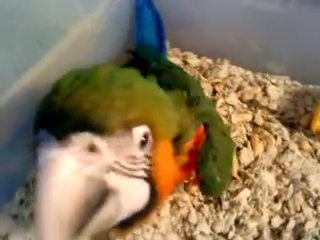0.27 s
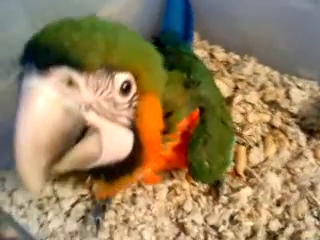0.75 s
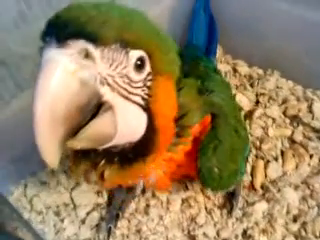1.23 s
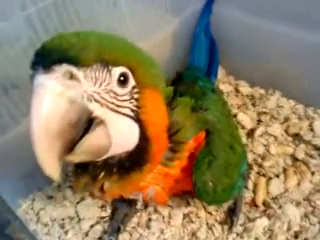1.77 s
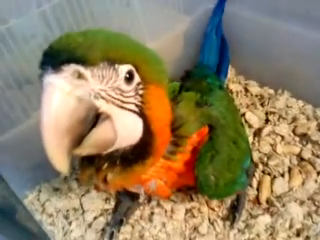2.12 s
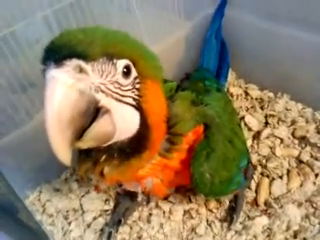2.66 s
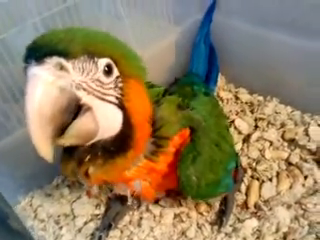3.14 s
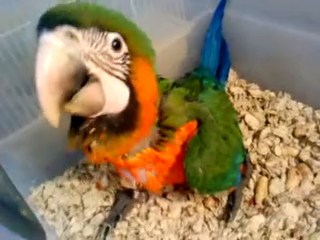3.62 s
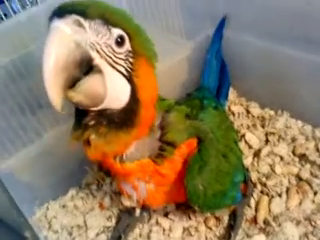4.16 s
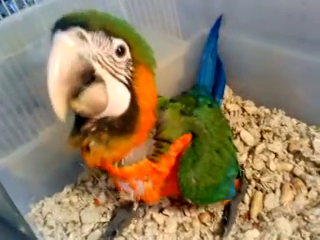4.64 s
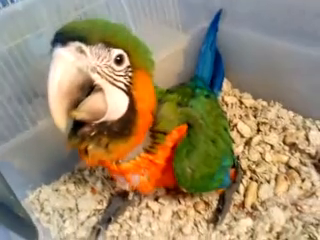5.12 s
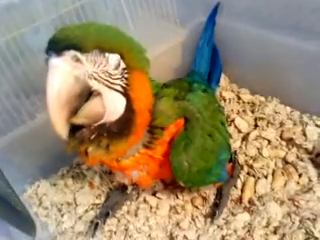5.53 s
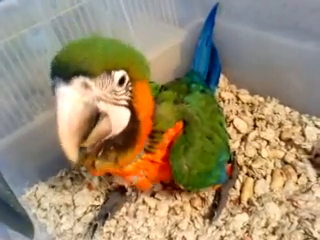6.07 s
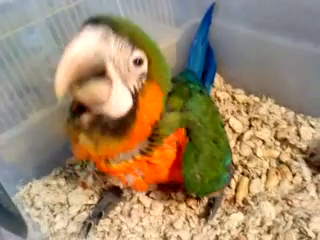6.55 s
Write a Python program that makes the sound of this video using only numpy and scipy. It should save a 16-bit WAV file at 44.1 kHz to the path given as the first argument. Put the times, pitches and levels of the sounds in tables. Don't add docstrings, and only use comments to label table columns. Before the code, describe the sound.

Close to a phone microphone, a young parrot rasps almost without pause, alternating open-beak hissy squawks with duller grumbles. Around it small birds peep, whistle and squeal. A larger parrot honks nasally within the first second, then screeches at about two and four seconds. Faint wing flutter and a low fan sit underneath, in a small hard-walled room with short echoes.

```python
import sys
import numpy as np
from scipy import signal
from scipy.io import wavfile
from scipy.ndimage import uniform_filter1d

SR = 44100
rng = np.random.default_rng(int(sys.argv[2]) if len(sys.argv) > 2 else 0)


def volts(x):
    e = np.asarray(x, float) / 20
    return 10 ** e


def log_audio(samples):
    frames = np.atleast_2d(samples).T
    limited = np.clip(frames, -1, 1)
    pcm = np.round(limited * 32767).astype(np.int16)
    wavfile.write(sys.argv[1], SR, pcm)


N = 299439


def evened(x):
    return x / np.sqrt(np.mean(x ** 2) + 1e-20)


def add(mix, start_s, sound):
    part = mix[round(start_s * SR):][:len(sound)]
    part += sound[:len(part)]


def wander(count, span_s):
    size = max(round(span_s * SR), 1)
    once = uniform_filter1d(rng.standard_normal(count), size)
    return evened(uniform_filter1d(once, size))


def resonate(x, hz, width_hz):
    turn = np.exp(2j * np.pi * np.cumsum(hz * np.ones(len(x))) / SR)
    decay = np.exp(-np.pi * width_hz / SR)
    return 2 * (turn * signal.lfilter([1 - decay], [1, -decay], x / turn)).real


def colour(x, points, patchy_db=0.):
    hz, _, z = signal.stft(x, SR, nperseg=1024, noverlap=768)
    point_hz, point_db = np.transpose(points)
    patches = uniform_filter1d(rng.standard_normal(z.shape), 7, 0)
    patches = evened(uniform_filter1d(patches, 7, 1))
    shape_db = np.interp(np.log(hz + 1), np.log(point_hz), point_db, -90, -90)[:, None]
    shape_db = shape_db + patchy_db * patches
    shaped = signal.istft(z * volts(shape_db), SR, nperseg=1024, noverlap=768)[1]
    return evened(shaped[:len(x)])


def membrane(hz, jitter, span_s, air):
    turns = np.cumsum(hz * np.exp(jitter * wander(len(hz), span_s))) / SR
    snaps = np.diff(np.floor(turns), prepend=0) * volts(1.6 * rng.standard_normal(len(hz)))
    puffs = (1.1 + np.exp(-(turns % 1) / 0.52)) * rng.standard_normal(len(hz))
    air = np.clip(air, 0, 1)
    return (1 - air) * evened(snaps) + air * evened(puffs)


RISE_DB = 20
BRISK_S = 0.057


def below(t, top_s, rise_s, hold_s, fall_db_s):
    swell_db = RISE_DB * (top_s - t) / abs(rise_s)
    fall_db_s = fall_db_s * (1 + BRISK_S / (abs(rise_s) + abs(hold_s)))
    fade_db = fall_db_s * (t - top_s - abs(hold_s))
    return np.maximum(np.maximum(swell_db, fade_db), 0)


# (time of full voice [s], rise [s], hold [s], throat level [dB], beak hiss level [dB])
OPEN_BEAK_SQUAWKS = [(.09, 0.27, 0.088, -27, -27.5), (.385, 0.084, 0.047, -28, -20.5),
                     (.905, 0.25, 0.085, -25, -28), (1.372, 0.14, 0.037, -26.5, -25.5),
                     (1.652, 0.09, 0.0067, -24, -26), (1.976, 0.13, 0.17, -26, -26),
                     (2.279, 0.083, 0.097, -24, -19.5), (2.583, 0.3, 0.016, -24, -22.5),
                     (2.69, 0.11, .02, -30, -31.5), (2.846, 0.0082, 0.13, -30.5, -33.5),
                     (3.5, 0.056, 0.036, -30.5, -34.5), (3.565, 0.045, 0.037, -28.5, -20.5),
                     (3.705, 0.03, 0.024, -23.5, -21), (3.84, 0.11, 0.02, -26, -17.5),
                     (3.91, 0.077, 0.0082, -32, -18.5), (4.664, 0.2, 0.029, -29, -33.5),
                     (4.788, 0.041, 0.063, -28.5, -21.5), (5.459, 0.13, 0.02, -22.5, -22),
                     (5.572, 0.12, 0.016, -34.5, -19.5), (5.862, 0.37, 0.025, -23.5, -31),
                     (6.345, 0.055, 0.027, -31, -35), (6.405, 0.018, 0.048, -32.5, -28.5),
                     (6.64, 0.21, .14, -32.5, -29.5)]
# (time of full voice [s], rise [s], hold [s], throat level [dB], beak hiss level [dB])
SHUT_BEAK_GRUMBLES = [(0, .1, 0.012, -27, -35), (.568, 0.082, 0.12, -20.5, -33.5),
                      (1.235, 0.081, .03, -26.5, -36), (1.57, 0.13, 0.027, -30.5, -40.5),
                      (1.896, 0.077, .01, -28.5, -35.5), (3.292, 0.21, 0.015, -26.5, -46),
                      (4.05, 0.16, 0.083, -23, -34), (4.25, 0.3, 0.027, -19.5, -34.5),
                      (4.42, 0.22, 0.0049, -33.5, -42), (4.575, 0.075, 0.025, -32, -38.5),
                      (4.979, 0.098, .085, -27.5, -41.5), (5.148, 0.065, 0.0032, -33, -34),
                      (5.252, 0.3, 0.083, -25, -36.5), (5.717, 0.72, .005, -28, -38),
                      (6.126, 0.089, 0.11, -29, -42.5), (6.55, 0.35, 0.0078, -28, -41)]
# (frequency [Hz], level [dB per Hz])
THROAT_SPECTRUM = [(530, -47.5), (900, -24), (1310, -5.5), (1620, -2.5), (2010, 1.5), (2390, 5), (2980, 1),
                   (4300, -4), (6000, -23.5), (7800, -27.5), (13200, -120)]
# (frequency [Hz], level [dB per Hz])
BEAK_SPECTRUM = [(2060, -14.5), (3500, -3), (4680, -3), (5090, -2.5), (5250, -1), (6800, -4.5), (8000, -17),
                 (9050, -41.5), (11800, -70.5), (19900, -120)]
SQUAWK_FALL_DB_S, GRUMBLE_FALL_DB_S = 108.5, 88
BEAK_STEEPER = 1.12
REST_THROAT_DB, REST_BEAK_DB = -45, -60
THROAT_HZ, THROAT_HZ_PER_DB = 3120, 16


def chick():
    t = np.arange(0, N / SR + .02, .001)
    throat_power, beak_power = volts(2 * REST_THROAT_DB), volts(2 * REST_BEAK_DB)
    voices = (OPEN_BEAK_SQUAWKS, SQUAWK_FALL_DB_S), (SHUT_BEAK_GRUMBLES, GRUMBLE_FALL_DB_S)
    for calls, fall_db_s in voices:
        for top_s, rise_s, hold_s, throat_db, beak_db in calls:
            under_db = below(t, top_s, rise_s, hold_s, fall_db_s)
            throat_power = throat_power + volts(2 * (throat_db - under_db))
            beak_power = beak_power + volts(2 * (beak_db - BEAK_STEEPER * under_db))
    sample_s = np.arange(N) / SR
    throat_db = np.interp(sample_s, t, 10 * np.log10(throat_power))
    beak_db = np.interp(sample_s, t, 10 * np.log10(beak_power))
    drive = membrane(np.full(N, 340.), jitter=.3, span_s=.004, air=.82)
    drive *= volts(.8 * wander(N, .012))
    throat = colour(drive, THROAT_SPECTRUM, patchy_db=3.3)
    throat_hz = THROAT_HZ + THROAT_HZ_PER_DB * (throat_db + 28)
    throat = evened(throat + .8 * resonate(throat, throat_hz, width_hz=900))
    beak = colour(drive, BEAK_SPECTRUM, patchy_db=4.0)
    return volts(throat_db - 4.0) * throat + volts(beak_db - 1.5) * beak


# (frequency [Hz], level [dB per Hz])
FAN_SPECTRUM = [(12, -45), (20, 3.5), (54, -9), (190, -15.5), (341, -12.5), (555, -16), (949, -14.5),
                (2210, -7.5), (3000, -19.5), (3590, -18.5), (6790, -41.5), (7920, -36), (9000, -56),
                (11700, -86), (19800, -120)]
# (frequency [Hz], level [dB])
MOTOR_TONES = [(53.8, -62), (140.0, -62.5), (231.5, -64), (344.5, -61.5)]
FAN_DB = -43.5


def fan():
    sound = volts(FAN_DB) * colour(rng.standard_normal(N), FAN_SPECTRUM)
    hiss = rng.standard_normal(N)
    for hz, db in MOTOR_TONES:
        tone = resonate(resonate(hiss, hz, width_hz=12), hz, width_hz=12)
        sound = sound + volts(db) * evened(tone)
    return sound


TRILL_HZ, TRILL_DEPTH = 85, .35


def chirp(length_s, start_hz, middle_hz, end_hz, db, waver_hz):
    u = np.linspace(-1, 1, round(1.15 * length_s * SR))
    arch_hz = (end_hz + start_hz) / 2 - middle_hz
    hz = middle_hz + (end_hz - start_hz) / 2 * u + arch_hz * u ** 2
    hz = hz + waver_hz * wander(len(u), .0025)
    beat = np.cumsum(TRILL_HZ * np.exp(.4 * wander(len(u), .008))) / SR + rng.random()
    burr = volts(2.4 * wander(len(u), .0018)) * (1 + TRILL_DEPTH * np.sin(2 * np.pi * beat))
    tone = np.sin(2 * np.pi * np.cumsum(hz) / SR)
    envelope = np.clip(np.minimum(.7 * (1 + u), .4 * (1 - u)) * length_s / .015, 0, 1)
    return volts(db + 2.5) * burr * tone * envelope


def glide(rows, overtones_db, waver, burr_db):
    s, pitch_hz, level_db = np.transpose(rows)
    t = np.arange(s[0], s[-1], 1 / SR)
    hz = np.interp(t, s, pitch_hz) * (1 + waver * wander(len(t), .003))
    turns = np.cumsum(hz) / SR
    tone = np.zeros(len(t))
    for k, db in enumerate((0, *overtones_db), 1):
        tone += volts(db + burr_db * wander(len(t), .003)) * np.sin(2 * np.pi * k * turns)
    level = np.sqrt(2) * volts(np.interp(t, s, level_db))
    return s[0], level * tone * signal.windows.tukey(len(t), .025)


# (time [s], length [s], pitch [Hz], level [dB])
HELD_NOTES = [(1.679, 0.049, 1586, -39.5), (3.297, 0.036, 1147, -43), (4.03, 0.022, 2230, -25.5),
              (4.22, .06, 1873, -25.5), (4.56, 0.022, 1916, -31.5), (4.579, 0.046, 2750, -32),
              (5.03, 0.029, 2147, -26), (5.031, .04, 2720, -28), (5.22, 0.036, 1276, -43),
              (6.071, .025, 1800, -33.5), (1.57, .039, 2250, -33.5), (2.041, 0.051, 2298, -28.5),
              (2.303, 0.079, 2652, -26.5), (2.482, 0.036, 2580, -33), (2.577, 0.058, 2670, -26),
              (2.696, 0.074, 2630, -38.5), (3.93, 0.035, 2310, -28.5), (4.249, .05, 2800, -25.5),
              (4.226, .03, 3090, -25), (4.184, .03, 2860, -27.5), (4.291, 0.055, 1854, -27.5),
              (5.153, 0.049, 2260, -32.5), (5.27, 0.034, 2390, -30), (6.186, 0.031, 2150, -28),
              (5.667, 0.046, 2050, -37.5), (6.72, 0.048, 2265, -31.5), (4.02, .06, 1330, -29),
              (4.963, 0.077, 1330, -50), (5, .04, 1620, -38.5), (6.55, 0.063, 2250, -35.5),
              (1.33, .08, 1020, -47), (1.49, .07, 1000, -46.5), (2.05, .1, 1200, -30.5),
              (1.955, .04, 4080, -30), (1.99, .04, 3620, -28),
              (0.585, 0.027, 3640, -29.5), (0.874, 0.034, 3070, -29), (1.879, 0.04, 2900, -33),
             (2.077, 0.027, 4020, -22.5), (3.352, 0.046, 3890, -39), (3.466, 0.026, 3014, -30.5),
             (4.12, 0.056, 3900, -25.5), (4.957, 0.055, 2880, -30), (5.654, 0.044, 3970, -29),
             (6.119, 0.037, 3780, -32.5), (6.166, .035, 3980, -34.5), (6.245, 0.021, 4340, -31),
             (3.867, 0.034, 3500, -25), (6.18, 0.028, 3070, -28), (6.311, 0.027, 3360, -32),
             (6.694, 0.068, 3290, -26), (1.14, 0.022, 3030, -23), (1.221, 0.029, 3450, -19.5),
             (5.8, 0.056, 3360, -25.5), (5.41, 0.03, 4210, -30), (5.457, .05, 4600, -31),
             (1.291, 0.17, 4170, -34.5), (1.332, 0.032, 3305, -19.5), (1.366, 0.075, 3964, -23),
             (1.742, 0.046, 3716, -30), (1.851, 0.06, 3396, -30), (2.036, 0.036, 3625, -24),
             (2.059, 0.071, 2877, -25.5), (2.492, 0.096, 3044, -30.5), (3.172, 0.052, 3140, -40.5),
             (3.789, 0.057, 3344, -25), (4.276, 0.085, 3770, -37.5), (4.484, 0.025, 3524, -27),
             (4.526, .035, 3585, -33), (4.847, 0.09, 2972, -24), (5.223, 0.061, 3825, -25),
             (5.511, 0.011, 3120, -7.5), (5.567, 0.07, 2965, -23), (5.794, 0.078, 3585, -23),
             (5.863, 0.053, 2930, -21), (5.904, 0.043, 3480, -25), (6.018, 0.023, 3720, -27),
             (6.133, 0.027, 3120, -30.5), (6.567, 0.054, 3170, -26), (6.59, 0.059, 3894, -21),
             (6.627, 0.052, 3060, -20.5), (6.679, .06, 3000, -27), (.882, .02, 3820, -29.5),
             (4.025, .04, 3050, -23), (4.043, .05, 3896, -26),
              (0.792, 0.037, 4490, -40), (0.031, 0.053, 4580, -33), (0.668, 0.047, 6020, -29.5),
              (5.393, 0.045, 5170, -32), (5.551, 0.026, 5010, -22.5), (2.861, 0.087, 6700, -41),
              (6.375, 0.027, 4770, -41), (6.4, 0.024, 4300, -43), (1.291, 0.017, 5420, -26),
              (1.553, 0.051, 4690, -35), (1.554, 0.045, 6640, -33), (1.74, 0.022, 4510, -29.5),
              (1.898, 0.04, 4550, -43), (2.019, 0.018, 5805, -18), (1.96, .03, 5230, -30),
              (2.052, .03, 4680, -30), (2.124, 0.051, 4850, -27), (2.322, 0.042, 4880, -24),
              (2.484, 0.027, 4730, -24.5), (2.534, 0.042, 4800, -27.5), (2.587, 0.033, 5310, -19),
              (3.432, 0.018, 5080, -32.5), (3.981, 0.046, 4556, -23), (4.788, 0.086, 4554, -24.5),
              (6.752, 0.033, 4450, -28.5)]
# (time [s], length [s], start pitch [Hz], end pitch [Hz], level [dB])
FALLING_NOTES = [(2.926, 0.041, 3300, 2595, -38), (1.802, .035, 3620, 3440, -36.5),
                 (0.538, 0.048, 3757, 3390, -22.5), (1.884, 0.07, 3390, 2600, -30.5),
                 (1.932, .04, 2500, 2250, -31), (4.471, 0.03, 4390, 3960, -33.5),
                 (1.126, .042, 4800, 2950, -32.5), (1.308, 0.063, 4100, 3230, -24.5),
                 (1.366, 0.048, 4160, 3880, -21.5), (2.922, 0.028, 4130, 3120, -34),
                 (2.949, 0.096, 1496, 1062, -47.5), (3.039, 0.12, 1070, 916, -48),
                 (3.258, 0.035, 4210, 3730, -33), (5.058, 0.06, 5290, 4800, -27),
                 (5.094, .06, 4730, 4340, -27), (5.769, 0.036, 3910, 3645, -21.5),
                 (5.816, 0.055, 3695, 3400, -22), (6.557, 0.03, 4650, 4520, -25.5),
                 (6.561, .03, 4250, 4100, -26.5), (6.72, .04, 4720, 4370, -24.5),
                 (1.005, .025, 3400, 2300, -22.5)]
# (time [s], length [s], start pitch [Hz], end pitch [Hz], level [dB])
RISING_NOTES = [(6.343, .09, 2193, 2554, -41.5), (6.575, 0.062, 3155, 3897, -19.5),
                (0.468, 0.14, 1043, 1128, -49), (1.955, 0.05, 5090, 5700, -37),
                (4.809, 0.071, 3610, 3860, -24.5), (5.192, 0.036, 3120, 3370, -24),
                (5.294, 0.11, 2820, 3195, -28.5)]
# (time [s], pitch [Hz], level [dB])
LONG_WHISTLE = [(0.0, 5410, -17), (.035, 5286, -21.5), (0.064, 5198, -21.5), (0.132, 5270, -31),
                (0.138, 5260, -20), (0.236, 5200, -44), (0.34, 5234, -48), (0.36, 5379, -48)]
# (time [s], pitch [Hz], level [dB])
SQUEAL_CURVES = [
    [(.278, 1545, -44), (.31, 1700, -36), (.345, 1950, -31), (.378, 2110, -25), (.42, 2060, -28),
     (.48, 2010, -26), (.54, 2050, -25.5), (.6, 2070, -33), (.72, 2110, -40)],
    [(5.36, 1640, -39), (5.402, 1854, -40.5), (5.436, 1930, -29), (5.47, 2290, -29.5), (5.51, 2380, -41)],
    [(6.395, 1400, -42), (6.45, 1560, -34), (6.483, 1780, -32), (6.508, 1900, -28), (6.55, 1910, -32),
     (6.585, 1930, -37), (6.62, 1975, -31), (6.69, 1940, -41)],
]
# (second partial level [dB], third partial level [dB])
SQUEAL_PARTIALS = [
    (-10, -12),
    (3, -21.5),
    (2.5, -13),
]
# (time [s], pitch [Hz], level [dB])
HIGH_PIPE = [(2.055, 5760, -38), (2.085, 5880, -21), (2.11, 5870, -22), (2.13, 5810, -22.5),
             (2.165, 5790, -27), (2.185, 5780, -23), (2.21, 5800, -34), (2.232, 5800, -26),
             (2.25, 5780, -38)]
PEEP_DROOP = 0.0078
STEADY_S = .06
SLIDE_WAVER_HZ, PEEP_WAVER_HZ = 115, 70
CHATTER_PER_S, CHATTER_HZ, CHATTER_DB, CHATTER_SPREAD_DB = 26, (1400, 4000), -49, 2.2


def flock():
    small = np.zeros(N)
    for s, length_s, hz, db in HELD_NOTES:
        waver_hz = PEEP_WAVER_HZ * min(STEADY_S / length_s, 1)
        add(small, s, chirp(length_s, hz, hz, hz * (1 - PEEP_DROOP), db, waver_hz))
    for s, length_s, start_hz, end_hz, db in FALLING_NOTES + RISING_NOTES:
        middle_hz = (start_hz + end_hz) / 2
        waver_hz = SLIDE_WAVER_HZ * start_hz / 3500
        add(small, s, chirp(length_s, start_hz, middle_hz, end_hz, db, waver_hz))
    add(small, *glide(LONG_WHISTLE, (), waver=.004, burr_db=2))
    for rows, overtones_db in zip(SQUEAL_CURVES, SQUEAL_PARTIALS):
        add(small, *glide(rows, overtones_db, waver=.03, burr_db=3))
    add(small, *glide(HIGH_PIPE, (), waver=.014, burr_db=2.2))
    low_hz, high_hz = CHATTER_HZ
    for when, long, pitch, slide, size in rng.random((round(CHATTER_PER_S * N / SR), 5)):
        hz = low_hz * (high_hz / low_hz) ** pitch
        db = CHATTER_DB - CHATTER_SPREAD_DB * np.log(size + .05)
        db = db + 9 * (pitch - 1)
        note = chirp(.025 + .06 * long, hz, hz, hz * (.93 + .12 * slide), db, hz / 50)
        add(small, when * N / SR, note)
    return small


# (time [s], length [s], effort [dB])
HONK_EVENTS = [
    (.535, .14, -37),
    (.668, .087, -36),
    (.9, .128, -19.5),
]
# (time [s], pitch [Hz])
HONK_PITCH_CURVES = [
    [(.545, 376), (.59, 385), (.62, 402), (.665, 384)],
    [(.678, 410), (.708, 417), (.725, 434), (.745, 420)],
    [(.912, 500), (.928, 517), (.948, 503), (1.0, 527), (1.016, 515)],
]
# (frequency [Hz], level [dB])
HONK_SPECTRUM = [(690, 1), (860, 1), (1020, -21), (1550, -11), (2050, -1), (2600, 0), (3100, 0), (4800, 0),
                 (5800, -8), (8200, -30)]
SCOOP_S, SCOOP = .014, .28
LOW_DB, LOW_PER_EFFORT = -34.5, .44
HONK_AIR = .12


def honk(s, length_s, effort_db, pitch):
    t = np.arange(0, length_s, 1 / SR)
    edge = np.clip(1 - np.minimum(t, length_s - t) / SCOOP_S, 0, 1)
    hz = np.interp(s + t, *np.transpose(pitch)) * (1 - SCOOP * edge)
    turns = np.cumsum(hz * (1 + .004 * wander(len(t), 0.0066))) / SR
    partials = np.zeros(len(t))
    for k in range(2, 16):
        partial = np.cos(2 * np.pi * (k * turns + rng.random()))
        partials += partial * volts(3 * wander(len(t), .012))
    high_pass = signal.butter(4, 1500, "high", fs=SR, output="sos")
    breath = signal.sosfilt(high_pass, membrane(hz, jitter=.02, span_s=.004, air=1))
    stack = (1 - HONK_AIR) * evened(partials) + HONK_AIR * breath
    low_db = LOW_DB - 6.2 * edge + LOW_PER_EFFORT * (effort_db + 22.5)
    low = volts(low_db) * np.sqrt(2) * np.sin(2 * np.pi * turns)
    stack_db = effort_db - 25 * edge - 5 * (2 * t / length_s - 1) ** 2
    note = low + volts(stack_db) * colour(stack, HONK_SPECTRUM)
    return s, note * volts(2 * wander(len(t), .012)) * signal.windows.tukey(len(t), .12)


# (time of full voice [s], rise [s], hold [s], effort [dB], pitch [Hz])
SCREECH_EVENTS = [
    (2.049, .05, 0.16, -24.5, 1195),
    (4.029, 0.1, 0.073, -19.5, 1098),
    (4.201, 0.28, 0.086, -22, 973),
]
# (frequency [Hz], level [dB per Hz])
SCREECH_SPECTRUM = [(210, -81.5), (350, -13.5), (700, -4), (910, 2), (1370, 3), (1480, -2), (1920, 3.5),
                    (2430, -7), (2950, 0), (3890, -0.5), (6840, -17), (8000, -36), (10400, -69.5),
                    (17600, -120)]
SCREECH_FALL_DB_S, SCREECH_SAG_HZ_S = 118.5, 217
SCREECH_FLOOR_HZ, FLOOR_DB_PER_OCTAVE = 480, 6


def screech(top_s, rise_s, hold_s, effort_db, start_hz):
    t = np.arange(top_s - .15, top_s + .55, 1 / SR)
    hz = start_hz - SCREECH_SAG_HZ_S * (t - top_s)
    cry = membrane(hz, jitter=.16, span_s=.003, air=.65)
    cry = colour(cry, SCREECH_SPECTRUM, patchy_db=1.3)
    cry = cry * volts(1.2 * wander(len(t), .003))
    octaves = np.clip((-20 - effort_db) / FLOOR_DB_PER_OCTAVE, -1, 1.2)
    floor_hz = SCREECH_FLOOR_HZ * 2 ** octaves
    cry = signal.sosfilt(signal.butter(4, floor_hz, "high", fs=SR, output="sos"), cry)
    level_db = effort_db + 1.0 - below(t, top_s, rise_s, hold_s, SCREECH_FALL_DB_S)
    return t[0], volts(level_db) * cry * signal.windows.tukey(len(t), .1)


# (time of full strength [s], rise [s], hold [s], level [dB])
WING_FLAPS = [
    (2.012, .1, 0.3, -50.5),
    (6.46, .05, 0.074, -54),
]
FLAP_HZ, FLAP_WIDTH_HZ, FLAP_FALL_DB_S = 377, 300, 153.5


def wings():
    air = resonate(rng.standard_normal(N), FLAP_HZ, FLAP_WIDTH_HZ)
    air = resonate(air, FLAP_HZ, FLAP_WIDTH_HZ)
    t = np.arange(N) / SR
    strength = np.zeros(N)
    for top_s, rise_s, hold_s, db in WING_FLAPS:
        strength += volts(db - below(t, top_s, rise_s, hold_s, FLAP_FALL_DB_S))
    return strength * volts(2.8 * wander(N, .008)) * evened(air)


def room(x, t60_s=.23):
    taps = np.zeros(SR // 2)
    at = np.arange(200, len(taps) - 20, 20)
    taps[at + rng.integers(0, 20, len(at))] = rng.choice([-1., 1.], len(at))
    taps *= volts(-60 * np.arange(len(taps)) / SR / t60_s)
    return signal.fftconvolve(x, taps / np.linalg.norm(taps))[:N]


def scene():
    near, steady_fan, small, large = chick(), fan(), flock(), np.zeros(N)
    for row, pitch in zip(HONK_EVENTS, HONK_PITCH_CURVES):
        add(large, *honk(*row, pitch))
    for row in SCREECH_EVENTS:
        add(large, *screech(*row))
    birds = near + small + large + room(volts(-5) * small + volts(-14) * (large + near))
    power = uniform_filter1d((birds + 0.45 * large) ** 2, round(.2 * SR))
    loud_db = 10 * np.log10(abs(power) + 1e-9)
    recovery_db = 5.5 * np.arange(N) / SR
    held_db = np.maximum.accumulate(loud_db + recovery_db) - recovery_db
    fan_gain = volts(-.55 * np.maximum(held_db + 28.5, 0) + 3.0)
    return (birds + wings() + steady_fan * fan_gain)[None]


# (frequency [Hz], rarity of a lost band [standard deviations])
DROPOUT_RARITY = [(1500, 2.8), (5500, 2.2), (6000, 1.4), (7350, .5), (7700, 1.5), (8050, .3), (9000, .7)]
# (time [s], length [s], lowest frequency [Hz])
TOP_BAND_LOSSES = [
    (.79, .07, 7400),
    (1.56, .04, 7600),
    (1.885, .085, 7500),
]


def lose_bands(x):
    hz, t, z = signal.stft(x, SR, nperseg=2048, noverlap=1536)
    chance = rng.standard_normal((len(hz), len(t)))
    chance = chance[np.arange(len(hz)) // 8]
    chance = evened(uniform_filter1d(chance, 12, 1))
    rarity_hz, rarity = np.transpose(DROPOUT_RARITY)
    kept = np.where(chance > np.interp(hz, rarity_hz, rarity, 9)[:, None], .01, 1)
    for s, length_s, low_hz in TOP_BAND_LOSSES:
        during = abs(t - s - length_s / 2) < length_s / 2 + .015
        kept[np.ix_(hz > low_hz, during)] = .003
    return signal.istft(z * kept, SR, nperseg=2048, noverlap=1536)[1][:, :N]


def top_cut(x):
    return signal.sosfilt(signal.butter(12, 9200, fs=SR, output="sos"), x)


EDGE_HZ = 9120


def record(dry):
    rounded = 0.88 * np.tanh(dry / 0.8)
    low_pass = signal.firwin(301, EDGE_HZ, window=("kaiser", 9), fs=SR)
    mix = signal.oaconvolve(lose_bands(rounded), low_pass[None], "same")
    return top_cut(mix)


dry = scene()
out = record(dry)
log_audio(out)
```